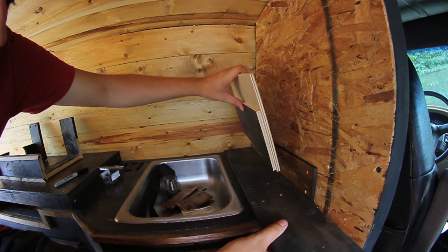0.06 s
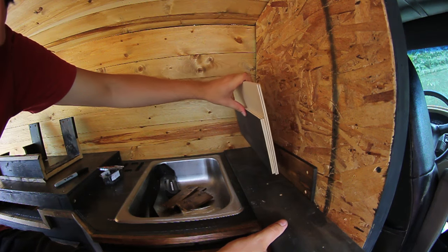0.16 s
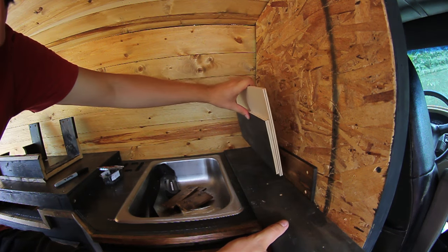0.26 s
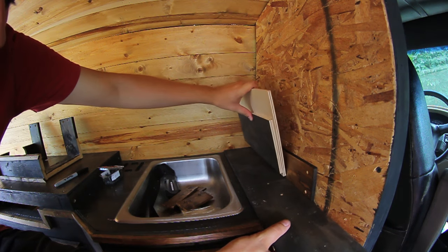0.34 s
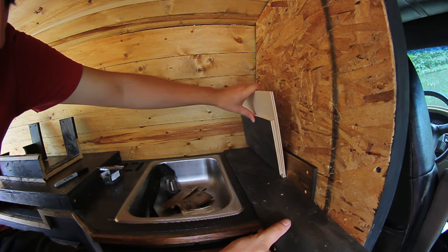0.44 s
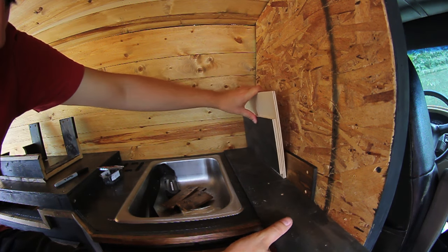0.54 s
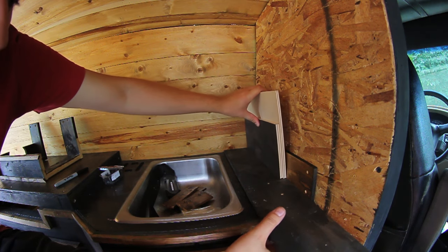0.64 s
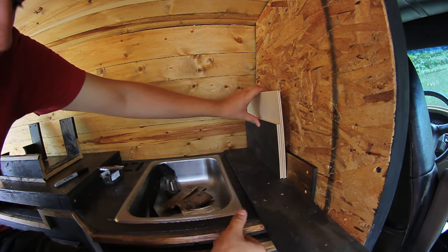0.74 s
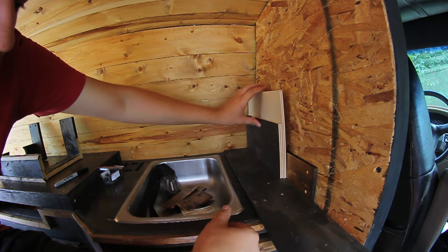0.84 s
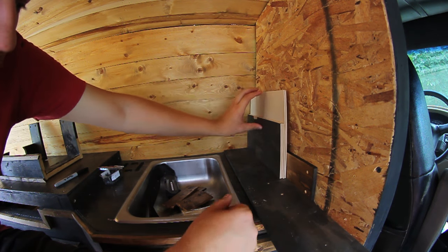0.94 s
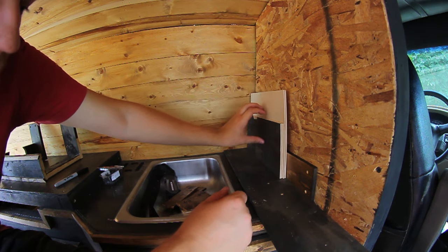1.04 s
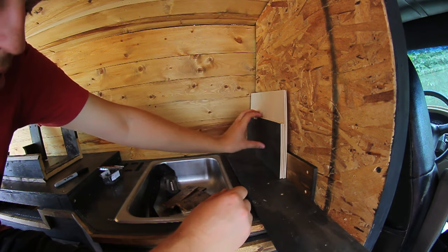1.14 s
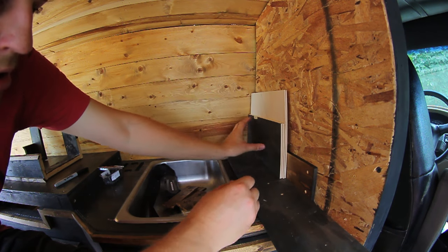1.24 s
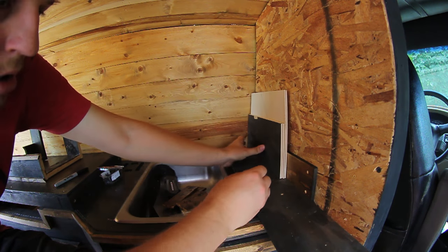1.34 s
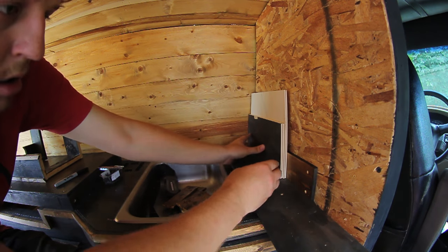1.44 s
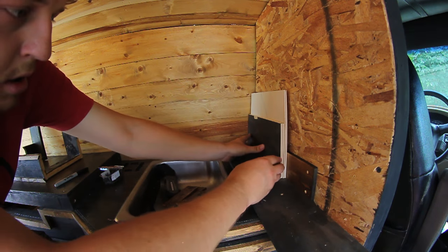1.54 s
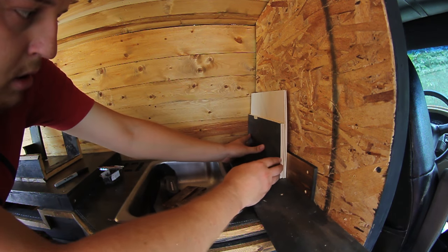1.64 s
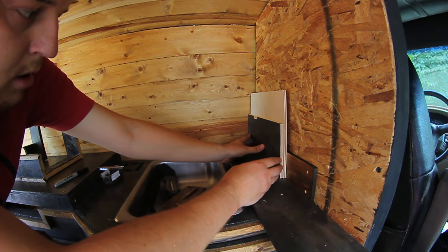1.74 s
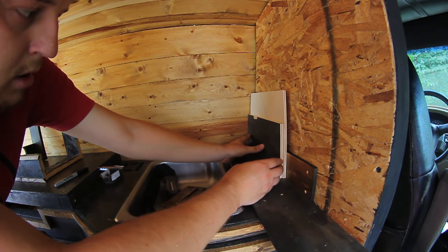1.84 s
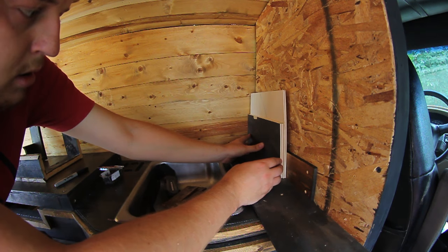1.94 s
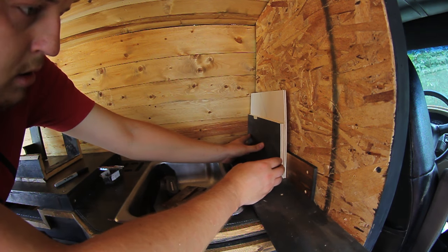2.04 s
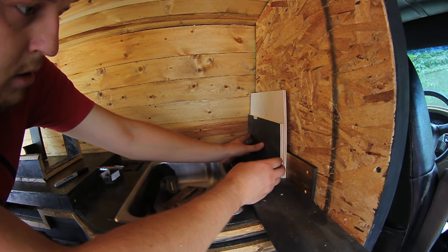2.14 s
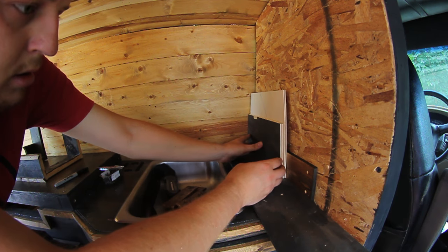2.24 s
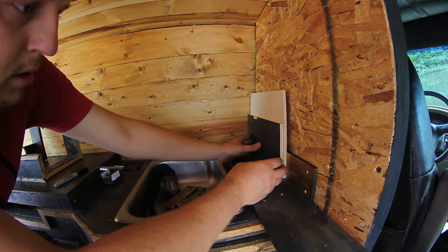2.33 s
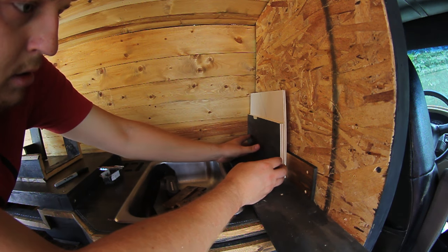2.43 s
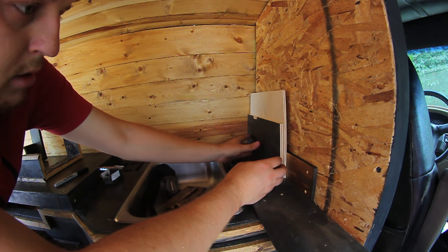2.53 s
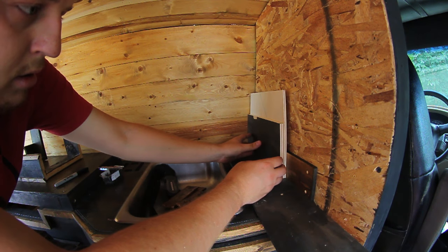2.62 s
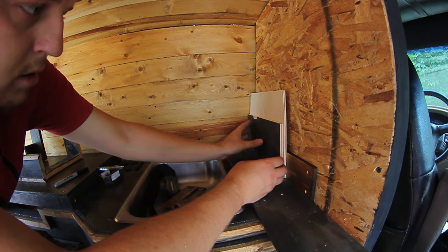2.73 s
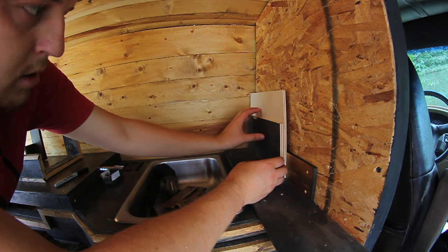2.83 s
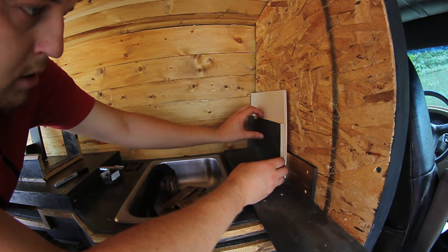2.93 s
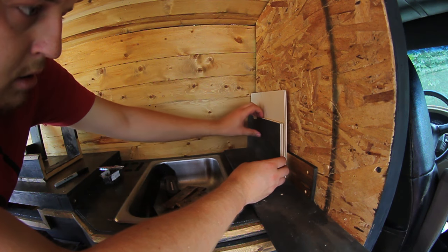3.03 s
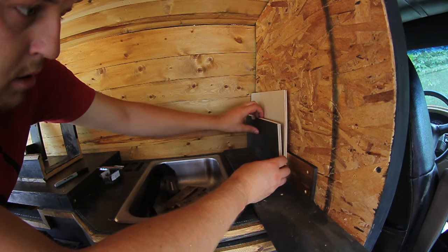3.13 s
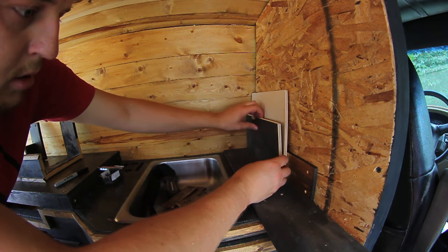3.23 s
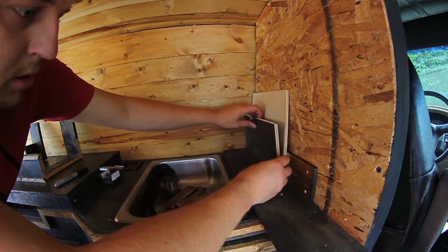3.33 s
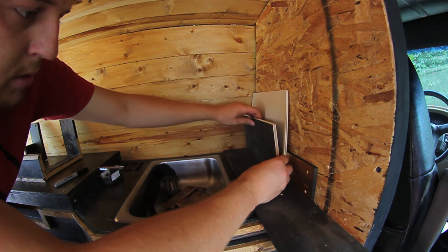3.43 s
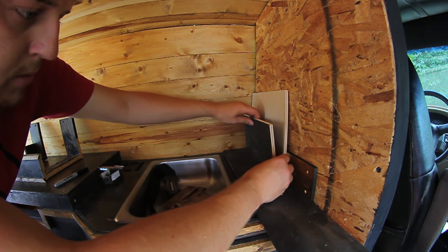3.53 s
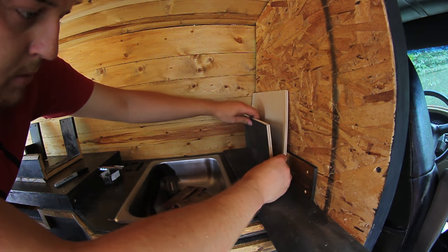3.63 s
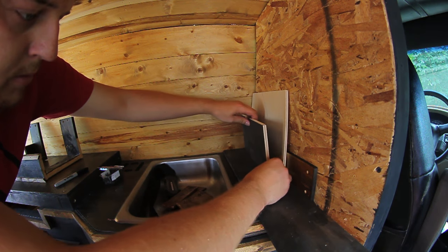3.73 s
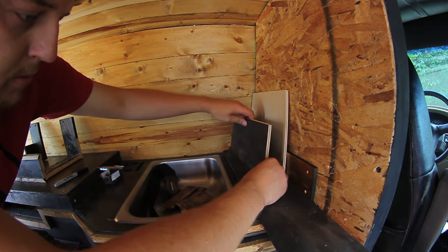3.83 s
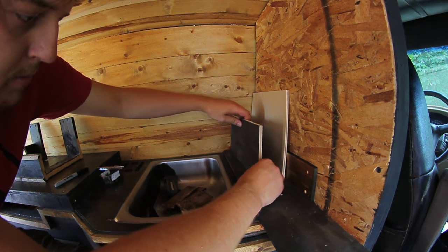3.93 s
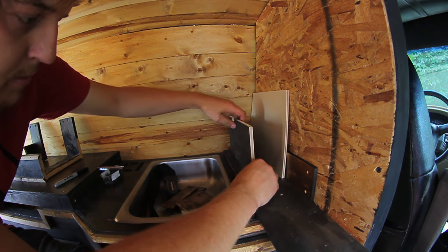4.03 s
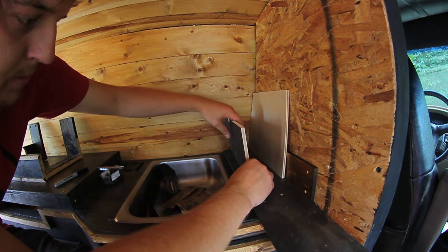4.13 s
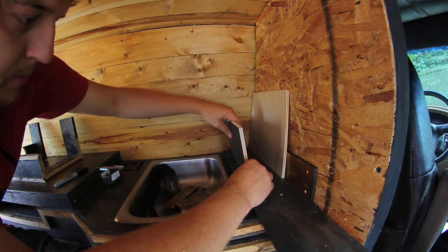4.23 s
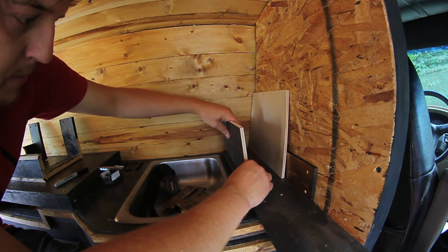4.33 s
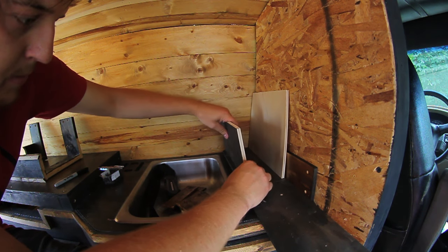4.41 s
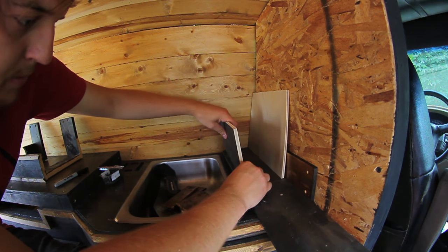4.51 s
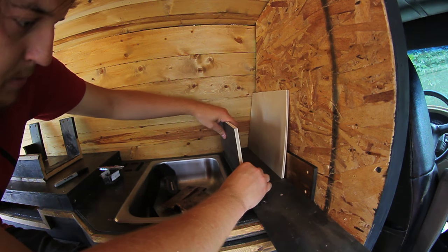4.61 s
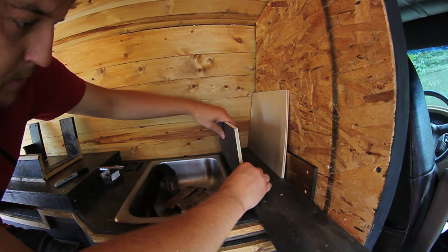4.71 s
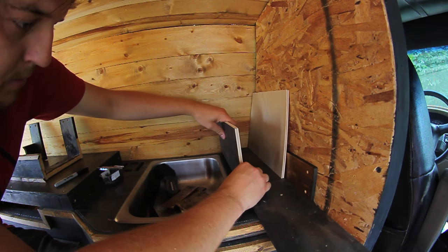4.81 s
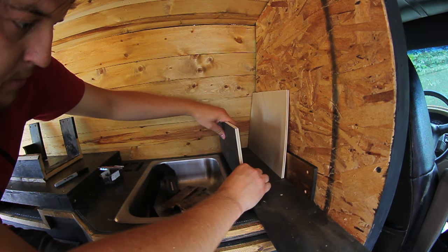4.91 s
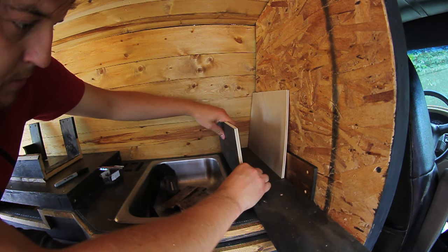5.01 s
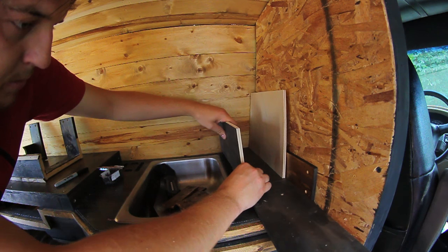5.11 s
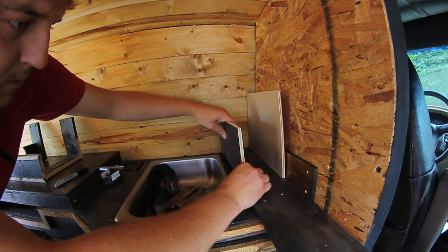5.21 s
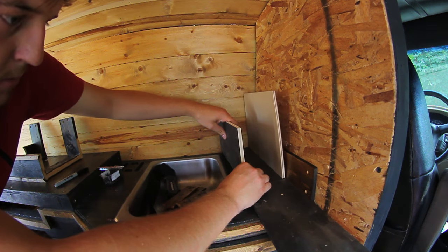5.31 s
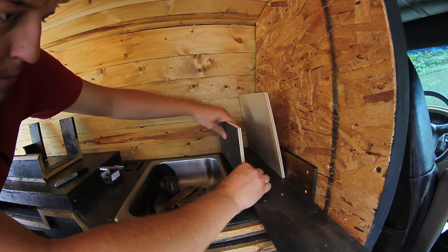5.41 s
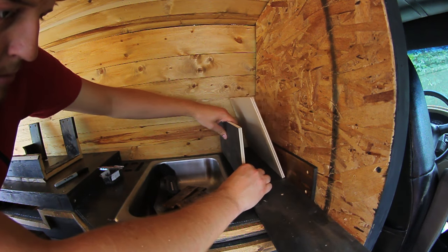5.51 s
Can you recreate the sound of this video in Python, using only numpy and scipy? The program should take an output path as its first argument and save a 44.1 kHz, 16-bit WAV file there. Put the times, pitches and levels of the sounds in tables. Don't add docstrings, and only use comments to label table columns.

```python
import sys
import numpy as np
from scipy import signal
from scipy.fft import rfft, irfft, next_fast_len
from scipy.io import wavfile
from scipy.ndimage import uniform_filter1d

SR = 44100
rng = np.random.default_rng(int(sys.argv[2]) if len(sys.argv) > 2 else 0)


def store_pcm(level_fs):
    pcm = np.round(np.clip(level_fs, -1, 1) * 32767).astype(np.int16)
    wavfile.write(sys.argv[1], SR, np.atleast_2d(pcm).T)


def gain_from_db(level_db):
    decades = np.asarray(level_db, float) / 20
    return 10 ** decades


N = 245195

# mode_hz, level_db, t60_s
BOARD_MODES = [(265, -8, .07), (315, -2, .075), (370, -7, .06), (425, -3, .07), (510, 0, .065),
               (570, -5, .05), (630, -4, .05), (700, -4, .05), (780, -2, .045), (880, -3, .04),
               (970, -5, .04), (1070, -4, .045)]
# mode_hz, level_db, t60_s
COUNTER_MODES = [(36, -24, .3), (56, -10.5, .3), (77.5, -13, .22), (97, -8, .17), (121, -4, 0.17),
                 (144.6, -1.5, .15), (168, -4.5, .15), (199.4, -4.5, .14), (235, -4, .15), (321.6, -6, .12)]


def unit(x):
    return x / np.sqrt(np.mean(x ** 2))


def colour(x, points):
    hz, db = np.transpose(points)
    size = next_fast_len(len(x))
    f = np.fft.rfftfreq(size, 1 / SR) + 1
    gain = gain_from_db(np.interp(np.log(f), np.log(hz), db))
    return irfft(rfft(x, size) * gain, size)[:len(x)]


def resonate(x, hz, width_hz):
    return signal.lfilter(*signal.iirpeak(hz, hz / width_hz, SR), x)


def flicker(rate_hz):
    hold = int(SR / rate_hz)
    levels = np.repeat(rng.standard_normal(N // hold + 1), hold)
    return uniform_filter1d(levels, hold)[:N]


def lag(x, tau_s):
    keep = np.exp(-1 / (tau_s * SR))
    return signal.lfilter([1 - keep], [1, -keep], x)


def hiss():
    # level_hz, density_db per Hz
    hiss_spectrum = [(15, -24), (25, 2), (49, -1.5), (184, -12.5), (513, -13), (572, -12.5), (930, -18),
                     (1320, -18), (2330, -26.5), (2890, -26), (15800, -33.5)]
    level_db = -59.5 + 0.39 * flicker(0.8)
    return gain_from_db(level_db) * unit(colour(rng.standard_normal(N), hiss_spectrum))


def cabin(x):
    t60_s, level_db, top_hz = 0.11, -17, 2450
    t = np.arange(SR // 3) / SR
    fade = gain_from_db(-60 * t / t60_s) * (t > .003)
    tail = rng.standard_normal(len(t)) * fade
    for _ in range(8):
        even = irfft(np.exp(1j * np.angle(rfft(tail))), len(t))
        tail = fade * even / np.sqrt(uniform_filter1d(even ** 2, size=150) + 1e-12)
    tail = signal.lfilter(*signal.butter(1, top_hz, fs=SR), tail)
    tail = tail / np.sqrt(np.sum(tail ** 2))
    return signal.fftconvolve(x, tail)[:N] * gain_from_db(level_db)


def edge(x):
    # centre_hz, width_hz, level_db
    edge_modes = [(1371, 33, 2), (1740, 82, -10), (1940, 180, -5.5), (2500, 51, -6.5), (2940, 180, -9),
                  (3145, 56, 2.5), (3374, 100, -2.5), (3617, 200, 1.5), (3900, 130, -1.5), (4310, 140, -1),
                  (4630, 31, 1.5), (5000, 93, 0), (5340, 130, -6.5), (5720, 29, -4), (6260, 120, -12.5),
                  (6860, 63.3, -6), (6860, 31, -18.5)]
    # level_hz, density_db per Hz
    grit_spectrum = [(400, -29.5), (900, -24), (1500, 2), (2600, 1.5), (3500, -2), (5400, 5), (6200, -2),
                     (7500, -32), (9000, -53), (16000, -46)]
    lift_db, wander_db = 5, 5.9
    y = colour(x, grit_spectrum)
    for hz, width_hz, db in edge_modes:
        y = y + gain_from_db(db + lift_db + wander_db * flicker(16)) * resonate(x, hz, width_hz)
    return y


def faces(x):
    # level_hz, density_db per Hz
    fine_spectrum = [(5000, -34.5), (7500, -2.5), (8500, -5.5), (12000, -5), (15000, -17), (17000, 1.5)]
    return unit(edge(x)), gain_from_db(0.9 * flicker(50)) * unit(colour(x, fine_spectrum))


def stroke_pressure(lean_db):
    # start_s, end_s, start_grit_db, end_grit_db
    scrapes = [(.582, .595, -37.5, -50), (.583, .695, -48, -39), (1.573, 1.61, -36.5, -58),
               (2.89, 2.965, -38.5, -54.5), (3.133, 3.182, -50.5, -39.5), (3.343, 3.459, -47, -51.5),
               (3.46, 3.533, -62, -54), (3.528, 3.605, -36.5, -37.5), (3.641, 3.743, -43.5, -54),
               (3.737, 3.767, -38.5, -33), (3.889, 4.12, -33.5, -41), (4.31, 4.359, -36.5, -20.5),
               (4.443, 4.483, -51, -59), (4.524, 4.566, -37, -63), (4.656, 4.69, -20.5, -56.5),
               (4.732, 4.752, -35.5, -71), (4.762, 4.785, -65, -55), (.241, .258, -25, -49)]
    # start_s, end_s, start_grit_db, end_grit_db
    drags = [(.238, .327, -45, -56), (.27, .345, -58.5, -52.5), (.345, .46, -43, -52.5),
             (.503, .531, -40.5, -30.5), (.519, .581, -35.5, -44.5), (.696, .72, -34.5, -46.5),
             (.868, .881, -40, -62), (.938, .952, -60, -37), (1.596, 1.773, -76, -58),
             (1.775, 1.88, -51, -73), (2.97, 3.16, -60, -58), (3.165, 3.256, -52, -54),
             (3.253, 3.334, -43.5, -41), (3.613, 3.635, -67, -48.5), (4.119, 4.208, -39, -50.5),
             (4.239, 4.303, -51.5, -44.5), (4.366, 4.388, -32, -90), (4.477, 4.519, -39.5, -36.5),
             (4.574, 4.615, -68, -63), (4.617, 4.658, -43, -40.5), (5.059, 5.096, -53.5, -52),
             (5.098, 5.156, -49.5, -29), (5.155, 5.167, -31, -90), (5.488, 5.556, -68, -60)]
    # start_s, end_s, start_grit_db, end_grit_db
    brushes = [(0, .028, -61.5, -80), (.478, .505, -62, -69), (.741, .87, -50, -42.5),
               (.899, .934, -60, -61), (1.134, 1.208, -57.5, -50.5), (1.205, 1.225, -51, -82),
               (1.288, 1.41, -62, -63), (1.4, 1.425, -51.5, -58), (1.428, 1.577, -51, -65),
               (1.882, 2.054, -66, -68), (2.199, 2.381, -75, -65.5), (2.363, 2.674, -63.5, -65),
               (2.668, 2.728, -60.5, -68.5), (3.745, 3.775, -41, -32), (3.775, 3.8, -32, -34.5),
               (3.8, 3.886, -32, -30.5), (3.886, 3.96, -45, -45), (3.99, 4.15, -42.5, -43),
               (4.398, 4.445, -77, -66), (4.815, 4.86, -66, -68), (4.92, 4.981, -47, -75),
               (4.973, 5.06, -80, -72)]
    # hum, rumble, fine hiss [dB over grit]
    scrape_stirs_db, drag_stirs_db, brush_stirs_db = (-5.5, -14.5, -11.5), (1.5, 4, -24), (-7.5, -15, -3.5)
    fine_slope, easy_db = 0.443, -41
    t = np.arange(N) / SR
    press = gain_from_db(lean_db + np.array([[-30], [-34.5], [-3.0], [-60]]))
    for strokes, stirs_db in ((scrapes, scrape_stirs_db), (drags, drag_stirs_db), (brushes, brush_stirs_db)):
        for start_s, end_s, in_db, out_db in strokes:
            on = slice(int(start_s * SR), int(end_s * SR))
            grit_db = np.interp(t[on], [start_s, end_s], [in_db, out_db])
            force = gain_from_db(grit_db + np.array([0, *stirs_db])[:, None])
            press[:, on] = np.maximum(press[:, on], force)
    press[3] *= (gain_from_db(easy_db) / np.maximum(press[0], gain_from_db(easy_db))) ** fine_slope
    return press


def slides():
    # time_s, rumble_db
    lean = [(0.0, -68), (0.29, -61), (0.42, -35), (0.52, -45), (0.71, -36), (0.84, -42), (1.05, -58),
            (1.28, -58.5), (1.63, -40), (1.97, -67.5), (2.9, -66), (3.13, -55), (3.69, -51.5), (4.09, -44),
            (4.69, -45.5), (4.89, -51.5), (5.17, -54), (5.56, -60)]
    sway_db, sway_hz = -6, 56
    lean_db = np.interp(np.arange(N) / SR, *np.transpose(lean))
    grit_press, hum_press, rumble_press, fine_press = stroke_pressure(lean_db)

    grain_sizes = gain_from_db(2.4 * np.minimum(rng.exponential(size=N), 3))
    grains = grain_sizes * rng.standard_normal(N) * (rng.random(N) < .4)
    grit, fine = faces(grains)
    chatter = gain_from_db(1.3 * flicker(150) + 1.3 * flicker(60) + 1.3 * flicker(25))
    rub = (lag(grit_press, .004) * grit + lag(fine_press, .008) * fine) * chatter

    drag = rng.standard_normal(N) * gain_from_db(1.2 * flicker(90))
    hum = unit(sum(gain_from_db(db) * resonate(drag, hz, 5.2 / t60_s) for hz, db, t60_s in BOARD_MODES))
    rumble = unit(sum(gain_from_db(db) * resonate(drag, hz, 2.0 / t60_s) for hz, db, t60_s in COUNTER_MODES))
    body = unit(resonate(drag, sway_hz, 26) + 0.66 * resonate(drag, 1.75 * sway_hz, 30))
    sway = gain_from_db(lean_db + sway_db + 2.8 * flicker(14)) * body
    return sway + rub * gain_from_db(1.5) + lag(hum_press, .006) * hum + lag(rumble_press, .02) * rumble * gain_from_db(-2.5)


def sing():
    # start_s, end_s, pitch_hz, level_db
    songs = [(1.134, 1.205, 814, -60.5), (1.14, 1.2, 1605, -61.5), (1.17, 1.196, 2690, -63),
             (2.892, 2.912, 810, -44), (2.895, 2.95, 1530, -50), (2.898, 2.942, 1110, -58),
             (2.898, 2.925, 4400, -52), (2.9, 2.935, 5830, -47.5), (2.9, 2.963, 2670, -56),
             (2.941, 2.976, 807, -52.5), (2.985, 3.015, 2830, -62), (2.997, 3.016, 4050, -58),
             (3.0, 3.025, 802, -62), (3.77, 3.926, 794, -51), (3.787, 3.86, 1296, -44.5),
             (3.82, 3.89, 2000, -42), (3.913, 3.963, 1333, -44), (3.94, 3.985, 1970, -40),
             (3.993, 4.112, 1974, -45), (4.01, 4.076, 1300, -46), (3.95, 4.108, 796, -50.5),
             (3.933, 3.965, 4397, -37), (4.5, 4.2, 801, -56), (4.126, 4.206, 1800, -51.5),
             (4.433, 4.48, 1990, -58), (.625, .648, 3750, -49.5), (.648, .695, 4960, -46),
             (0.746, .88, 3620, -56), (3.536, 3.6, 3550, -43), (3.53, 3.605, 5150, -44.5),
             (3.54, 3.575, 5300, -46), (3.648, 3.729, 3520, -54), (3.764, 3.798, 5300, -36.5),
             (3.771, 3.885, 5150, -40), (3.807, 3.885, 4400, -40.5), (3.97, 4.06, 4580, -42),
             (3.95, 4.1, 3560, -50), (4.472, 4.541, 3700, -52), (4.625, 4.655, 3700, -51),
             (4.657, 4.67, 3046, -28.5), (4.512, 4.543, 354, -34.5), (4.31, 4.352, 760, -39),
             (4.34, 4.36, 1270, -33), (4.33, 4.36, 3400, -36), (4.515, 4.535, 2050, -46),
             (5.13, 5.16, 3800, -39), (5.135, 5.16, 4400, -40), (.65, .7, 4300, -51),
             (3.9, 4.14, 5650, -46), (3.738, 3.76, 5300, -40)]
    out, pad = np.zeros(N + SR), SR // 25
    flutter = gain_from_db(4.4 * flicker(40))
    for start_s, end_s, hz, db in songs:
        on = slice(int(start_s * SR), int(end_s * SR) + pad)
        press = lag(np.arange(on.start, on.stop) < end_s * SR, 0.0046)
        width_hz = 67 * np.sqrt(hz / 1500)
        tone = resonate(rng.standard_normal(len(press) + pad), hz, width_hz)
        tone = resonate(tone, hz, 2 * width_hz)[pad:]
        out[on] += gain_from_db(db) * press * flutter[on] * unit(tone)
    return out[:N]


def snaps():
    # time_s, snap_db, ping_db
    snap_events = [(.4065, -28.5, -51.5), (.5793, -6, -12), (.6125, -30, -15), (.6185, -30, -18),
                   (.384, -26.5, -35), (.745, -42.5, -48), (.918, -39, -50), (4.658, -20, -20),
                   (4.663, -20.5, -23), (5.1602, -27, -45), (3.902, -30.5, -32), (4.777, -37, -54)]
    # level_hz, density_db per Hz
    snap_spectrum = [(600, -24), (1500, -0.5), (4000, 2), (6000, -1.5), (8000, -11), (12000, -22),
                     (16000, -30)]
    snap_t60_s, ping_hz, ping_t60_s = 0.0071, 3690, 0.0099
    shape, pings, t = np.zeros(N), np.zeros(N), np.arange(SR // 40) / SR
    for s, snap_db, ping_db in snap_events:
        at = slice(int(s * SR), int(s * SR) + len(t))
        shape[at] += gain_from_db(snap_db - 60 * t / snap_t60_s)
        pings[at] += gain_from_db(ping_db - 60 * t / ping_t60_s) * np.sin(2 * np.pi * ping_hz * t)
    return pings + shape * unit(colour(rng.standard_normal(N), snap_spectrum))


def ring(modes, t, scatter_db, spread_rad):
    hz, db, t60_s = np.transpose(modes)[:, :, None]
    size, detune, phase = rng.standard_normal((3, len(modes), 1))
    wave = np.sin(2 * np.pi * hz * (1 + .025 * detune) * t + spread_rad * phase)
    y = (gain_from_db(db + scatter_db * size) * wave * gain_from_db(-60 * t / t60_s)).sum(axis=0)
    return y / np.sqrt(uniform_filter1d(y ** 2, size=220).max())


def counter_thump(t):
    push = 1 - np.exp(-t / 0.00047)
    end_fade = np.minimum(1, 20 * (t[-1] - t))
    return ring(COUNTER_MODES, t, 0.88, 1.41) * push * end_fade


def board_ring(t, top_hz, hard_db):
    hz, db, t60_s = np.transpose(BOARD_MODES)
    soft_db = -min(hard_db, 0)
    held_db = db - 5.6 * np.abs(np.log2(hz / top_hz))
    favoured = [top_hz, 5, .88 / np.sqrt(top_hz)]
    contact = [1.3 * top_hz, 5.5 - .3 * soft_db, 0.0078]
    modes = np.vstack([np.transpose([hz, held_db, t60_s]), favoured, contact])
    push_s = 0.00034 * gain_from_db(.35 * soft_db)
    board = gain_from_db(.06 * soft_db) * ring(modes, t, 1.8, .7) * (1 - np.exp(-t / push_s))
    return signal.lfilter(*signal.butter(2, 0.53 * top_hz, "high", fs=SR), board)


def board_clack(t):
    # mode_hz, level_db, t60_s
    clack_modes = [(1200, -1, .04), (1320, -3, .03), (1480, 0, .035), (1660, 0, .028), (1800, -4, .025),
                   (1950, -2, .028), (2200, -4, .03), (2440, -5, .028), (2650, -9, .022)]
    return ring(clack_modes, t, 1.8, .9) * (1 - np.exp(-t / .0003))


def knocks():
    # time_s, ring_db, top_hz (strongest ring),
    # hard_db (clack over ring), weight_db (thump over ring)
    blows = [(.2415, -10.5, 346, -22, -4.5), (.249, -10.5, 462, -6.5, -20), (0.258, -13, 206, -11, -8.5),
             (0.277, -16.5, 310, -22, -1), (.287, -18.5, 300, -23, -6), (0.349, -15.5, 492, -24, -2),
             (.357, -18, 248, -25, -2), (.384, -16, 336, -1, -8), (.407, -23, 318, -21, 6.5),
             (0.4528, -21, 530, -12, 2), (0.509, -39, 800, 6, 4), (0.525, -20.5, 328, -1, -12.5),
             (0.536, -17, 277, -17.5, 0.5), (0.548, -18.5, 323, -8, -0.5), (0.58, -6, 534, 0.5, -15),
             (0.6123, -7, 532, -8.5, -13), (.617, -11, 543, -11, -10.5), (0.6962, -3, 809, -9, -24),
             (0.7011, -12, 525, -9.5, -14), (.708, -20.5, 537, -15, -17.5), (0.863, -35.5, 350, -2, -16),
             (0.949, -29, 780, -8.5, -1.5), (0.268, -21, 430, -10, -2), (.297, -23, 240, -30, -1),
             (.325, -24, 253, -28, -1.5), (.368, -22, 300, -26, -4), (.425, -23, 282, -26, -4),
             (1.139, -40, 806, -7, -2.5), (1.175, -51, 760, 6, -21), (1.21, -55.5, 804, -8, -13),
                (1.358, -29, 532, -28, -4), (1.58, -38, 600, -4, -4), (1.5968, -22, 507, -26, -1.5),
                (1.604, -27, 235, -30, 0.5), (1.615, -28, 370, -28, 2), (1.626, -35, 383, -30, -7),
                (1.645, -34, 360, -30, -4), (1.667, -34.5, 253, -30, -6), (1.785, -45, 570, -20, -2),
                (1.716, -40, 472, -14, 3), (2.457, -51, 515, 1, -12.5),
             (2.894, -33, 790, -11, -8), (3.129, -28.5, 813, 0.5, -15), (3.263, -30, 830, -12, -23),
               (3.265, -21.5, 803, -12, -28), (3.277, -41, 900, 6, 1), (3.297, -42, 820, 10.5, -13),
               (3.3214, -21.5, 301, -13, 5), (3.327, -16, 630, -5, -16), (3.374, -39, 770, 4, -13),
               (3.823, -27, 620, -16, -20), (3.8933, -8, 501, -22, -12.5), (3.902, -18, 470, -21, -15),
               (3.912, -23.5, 500, -25, -16), (4.15, -25.5, 403, -20, -2), (4.361, -10, 406, -33, -21),
               (4.375, -28, 288, -16, 3.5), (4.497, -39, 417, 4, 12), (4.531, -32, 363, -10, -30),
               (4.658, -16, 520, -11, -8), (4.683, -22.5, 367, -32, -28), (4.7767, -21.5, 343, -24, -1.5),
               (4.79, -33.5, 446, -26, -2), (4.802, -35, 330, -33, 5), (5.1165, -14.5, 480, -12.5, -12),
               (5.121, -20.5, 740, -14, -12), (5.1606, -12, 473, -5.5, -9), (5.172, -27, 497, -15, -2),
               (5.274, -39.5, 447, -30, -0.5), (5.3236, -38, 350, -16, -1.5), (5.398, -41, 417, -18.5, -7),
               (5.414, -42.5, 341, -19, -13), (5.521, -41, 365, -23, -7)]
    # time_s, thump_db
    bumps = [(0.003, -40), (0.035, -39.5), (0.09, -43.5), (.13, -48), (0.955, -39), (0.985, -41),
             (2.892, -35.5), (2.95, -40), (4.715, -33), (4.861, -41), (4.92, -44), (1.1038, -46),
             (1.23, -42), (1.488, -43), (1.75, -40), (4.195, -29.5), (4.732, -34), (5.08, -35),
             (1.572, -36), (4.145, -34)]
    # time_s, crack_db
    ticks = [(0.4527, -47), (.507, -30), (0.534, -30.5), (0.581, -25), (.617, -36), (0.863, -46),
             (0.95, -51), (1.46, -34.5), (1.582, -35), (1.597, -35), (1.715, -36), (2.457, -56.5),
             (2.592, -41.5), (3.127, -30.5), (3.262, -28), (3.277, -30), (3.312, -36.5), (4.143, -26.5),
             (4.66, -29), (4.68, -24.5), (4.734, -41), (4.777, -45), (4.479, -34), (1.49, -52),
             (2.212, -50.5), (5.082, -53), (5.324, -47.5), (5.414, -54)]
    crack_over_clack_db, crack_fine_db, crack_rise_s = -17, -21, 0.0013
    bump_top_hz = 170
    out, cracks = np.zeros(N + SR), np.zeros(N + SR)
    t = np.arange(SR // 5) / SR
    brief = t[:SR // 12]
    crack = gain_from_db(-60 * t / 0.023) + 0.017 * gain_from_db(-60 * t / 0.07)
    crack = crack * (1 - np.exp(-t / crack_rise_s))

    def at(s):
        return slice(int(s * SR), int(s * SR) + len(t))

    for s, ring_db, top_hz, hard_db, weight_db in blows:
        board = board_ring(brief, top_hz, hard_db) + gain_from_db(hard_db - 2.0) * board_clack(brief)
        out[at(s)][:len(brief)] += gain_from_db(ring_db) * board
        out[at(s)] += gain_from_db(ring_db + weight_db - 3.5) * counter_thump(t)
        cracks[at(s)] += gain_from_db(ring_db + hard_db + crack_over_clack_db) * crack
    for s, thump_db in bumps:
        out[at(s)] += gain_from_db(thump_db) * signal.lfilter(*signal.butter(2, bump_top_hz, fs=SR), counter_thump(t))
    for s, crack_db in ticks:
        cracks[at(s)] += gain_from_db(crack_db) * crack
    grit, fine = faces(rng.standard_normal(N))
    return out[:N] + cracks[:N] * (grit + gain_from_db(crack_fine_db) * fine)


def scene():
    wood = knocks() + snaps() + slides() + sing()
    return (wood + cabin(wood) + hiss())[None]


def roll_off(x):
    return signal.sosfilt(signal.butter(12, 15850, fs=SR, output="sos"), x)


def record(dry):
    low_hz, top_hz = 29.3, 15750
    heard = signal.lfilter(*signal.butter(1, low_hz, "high", fs=SR), dry)
    heard = np.clip(heard, -1, 1)
    heard = signal.sosfilt(signal.ellip(12, .2, 90, top_hz, fs=SR, output="sos"), heard)
    return roll_off(heard)


dry = scene()
out = record(dry)
store_pcm(out)
```